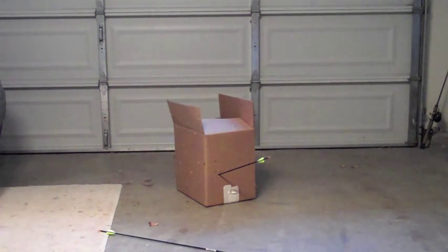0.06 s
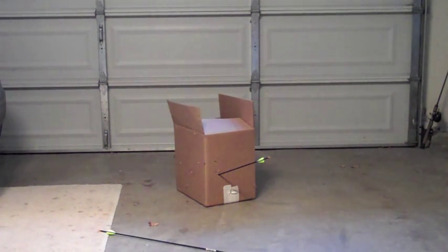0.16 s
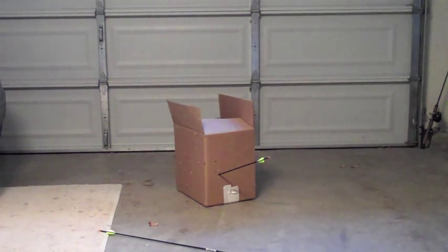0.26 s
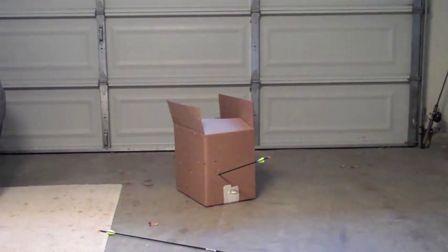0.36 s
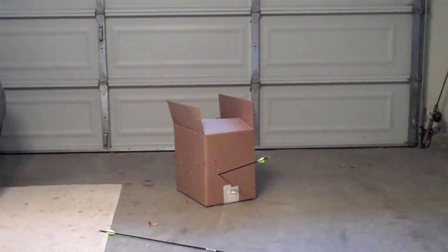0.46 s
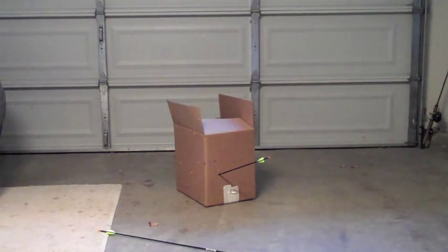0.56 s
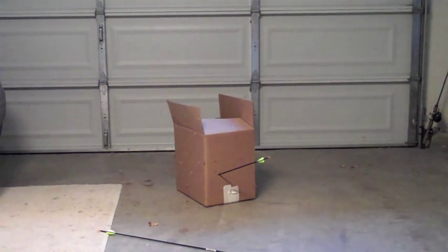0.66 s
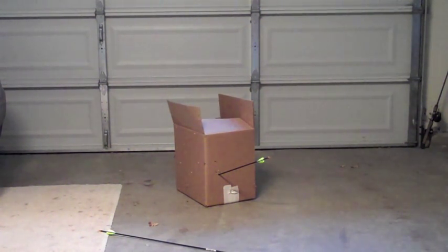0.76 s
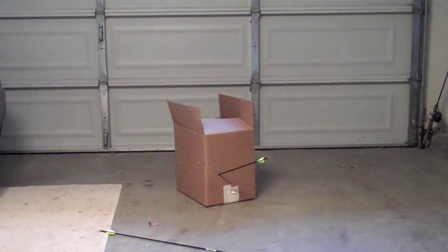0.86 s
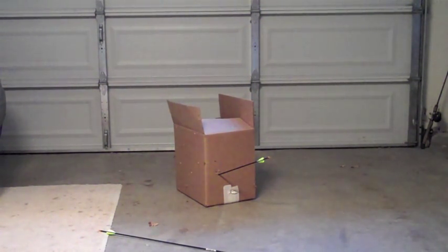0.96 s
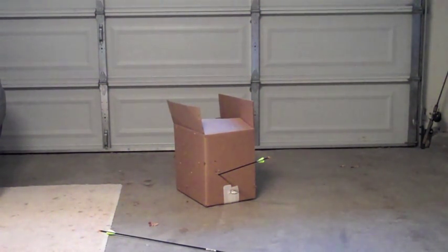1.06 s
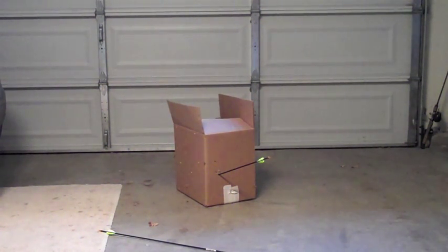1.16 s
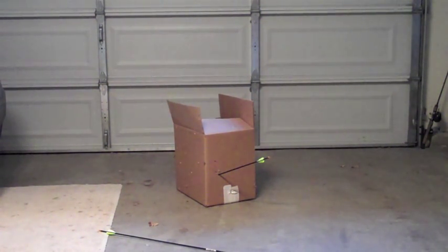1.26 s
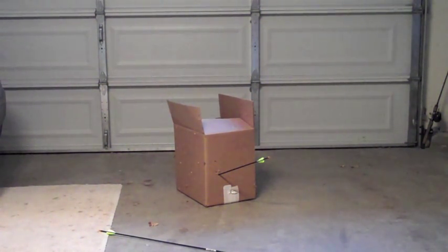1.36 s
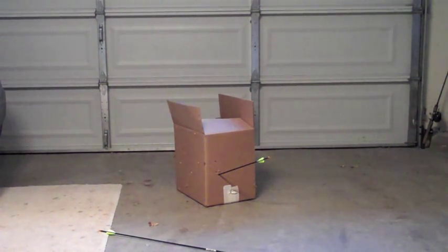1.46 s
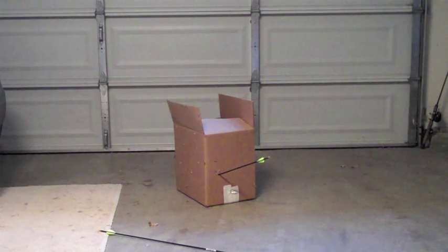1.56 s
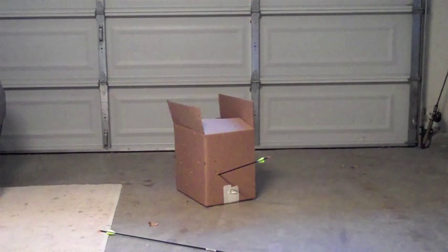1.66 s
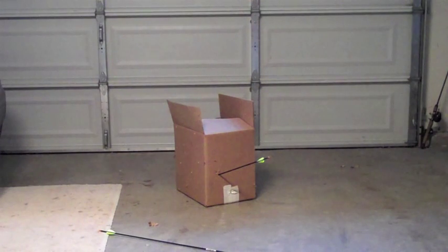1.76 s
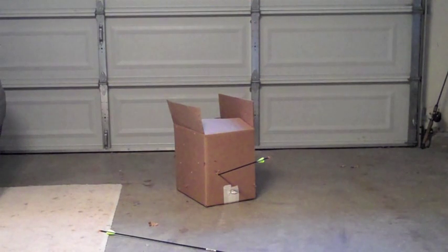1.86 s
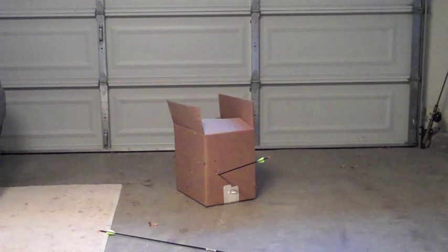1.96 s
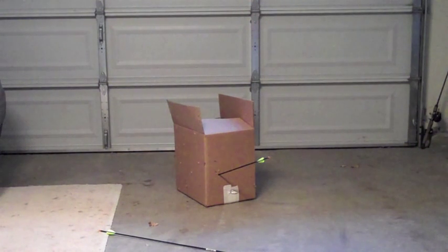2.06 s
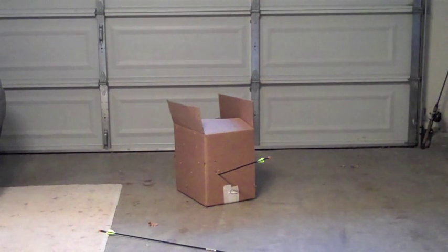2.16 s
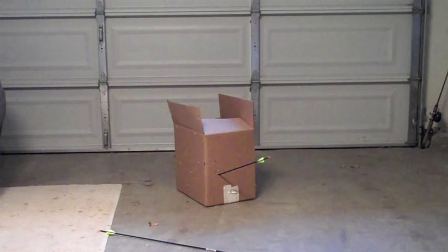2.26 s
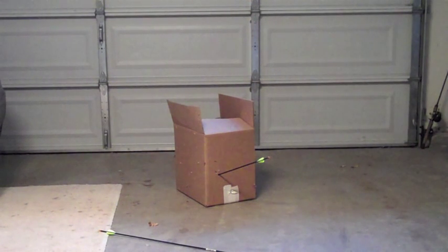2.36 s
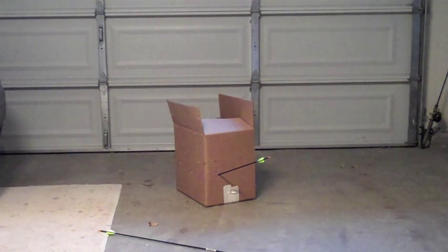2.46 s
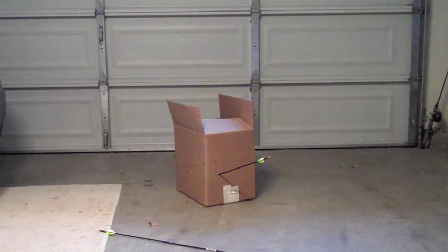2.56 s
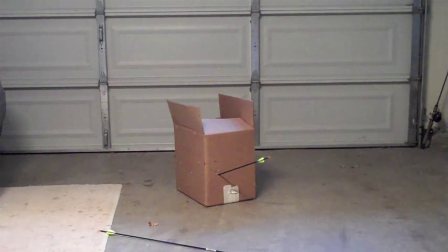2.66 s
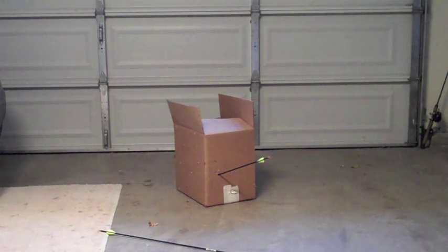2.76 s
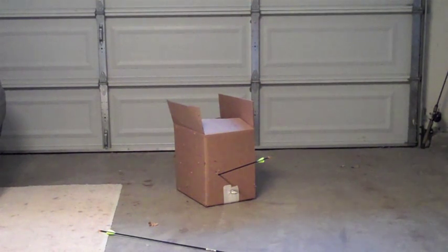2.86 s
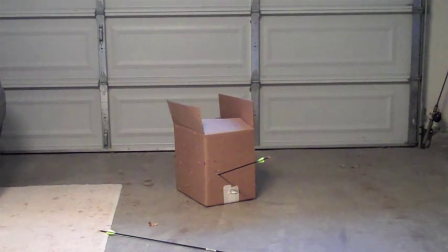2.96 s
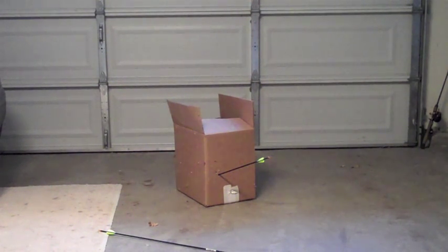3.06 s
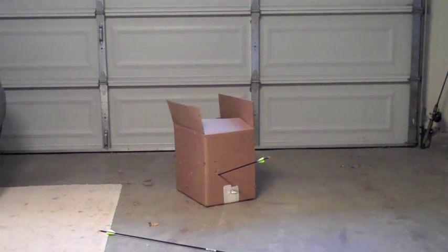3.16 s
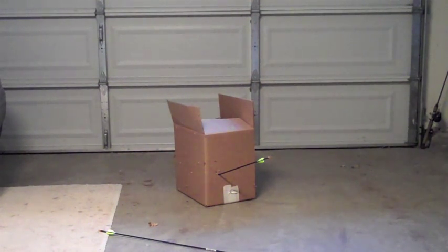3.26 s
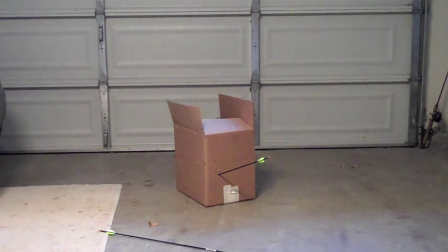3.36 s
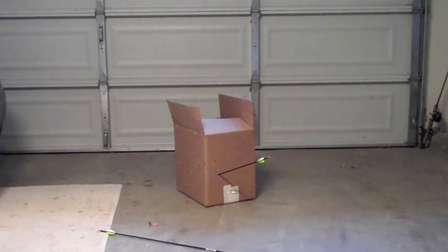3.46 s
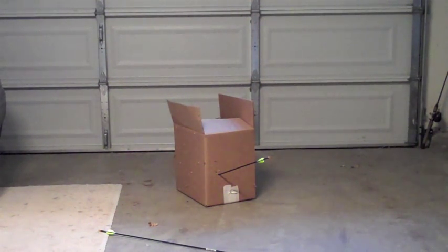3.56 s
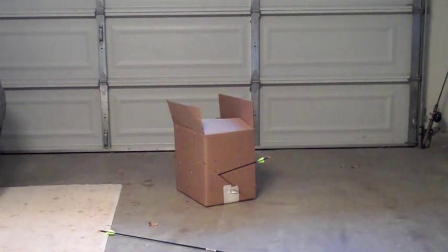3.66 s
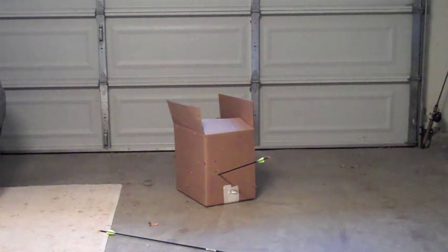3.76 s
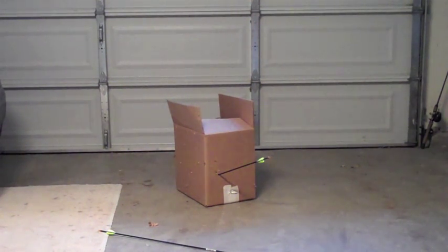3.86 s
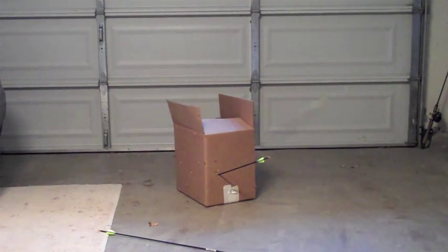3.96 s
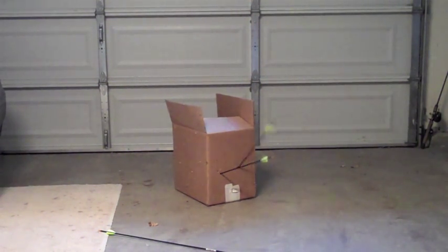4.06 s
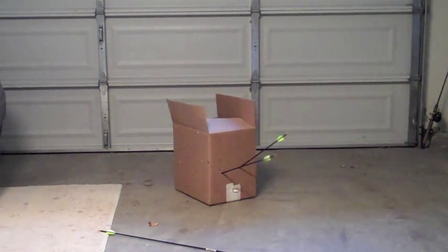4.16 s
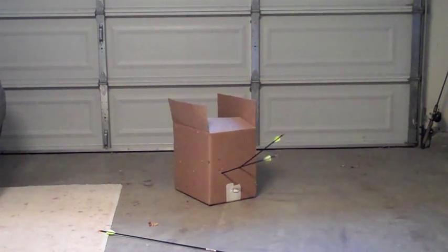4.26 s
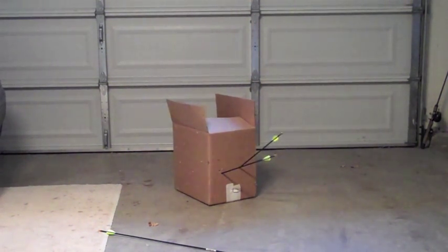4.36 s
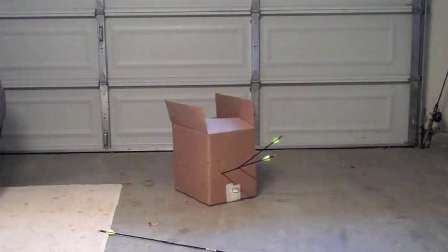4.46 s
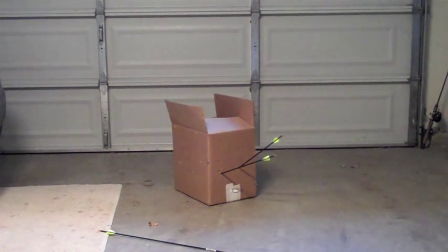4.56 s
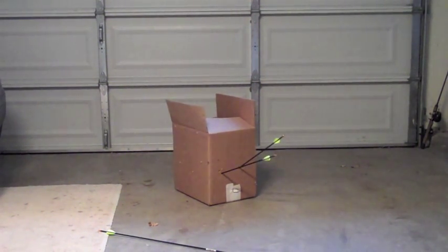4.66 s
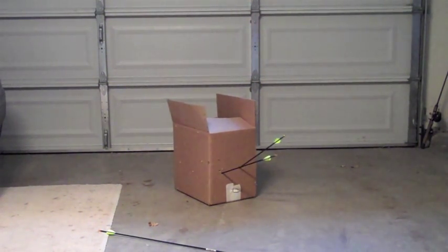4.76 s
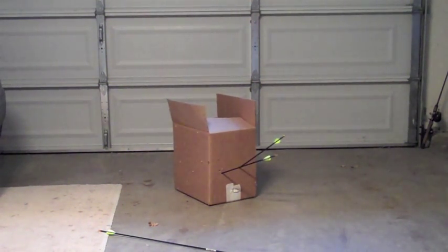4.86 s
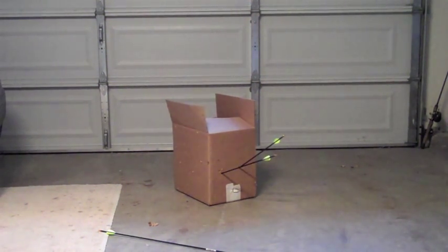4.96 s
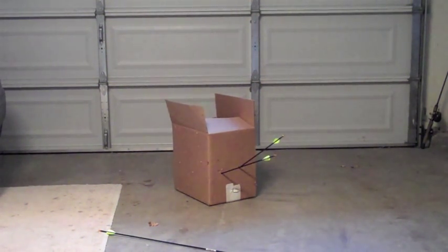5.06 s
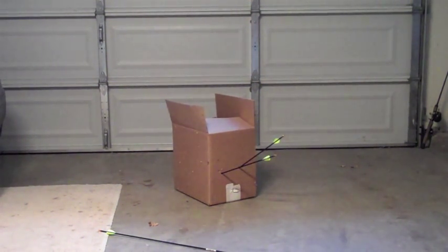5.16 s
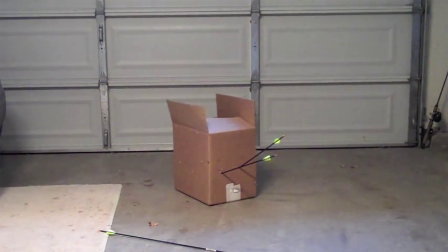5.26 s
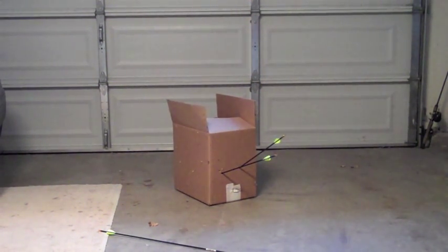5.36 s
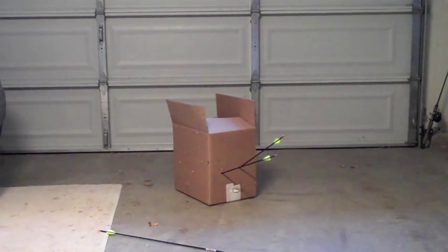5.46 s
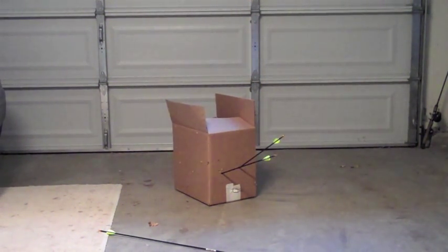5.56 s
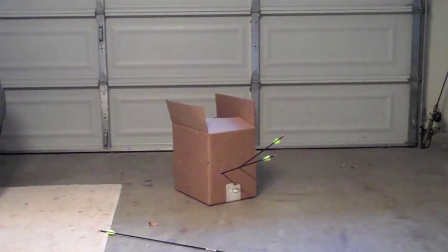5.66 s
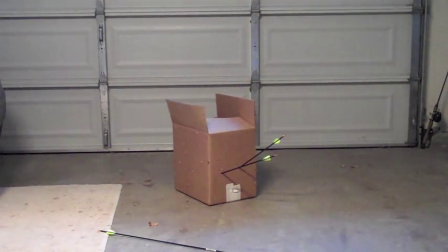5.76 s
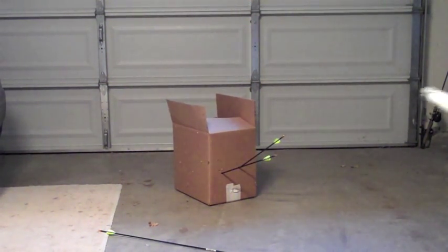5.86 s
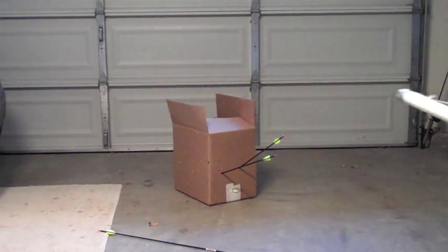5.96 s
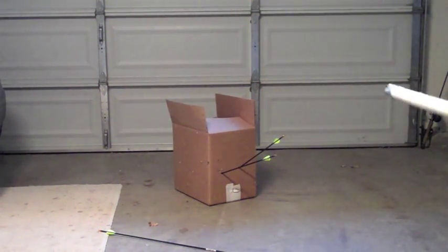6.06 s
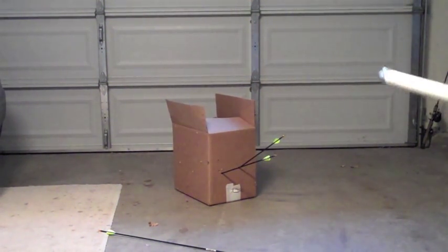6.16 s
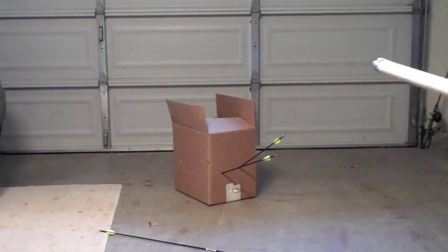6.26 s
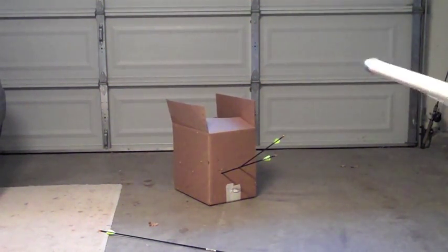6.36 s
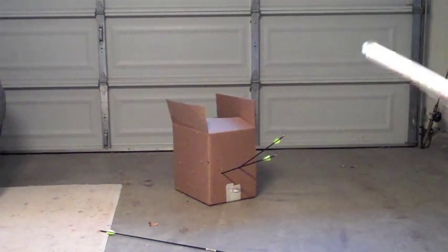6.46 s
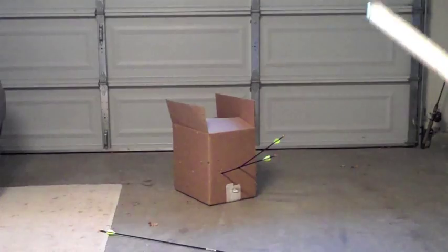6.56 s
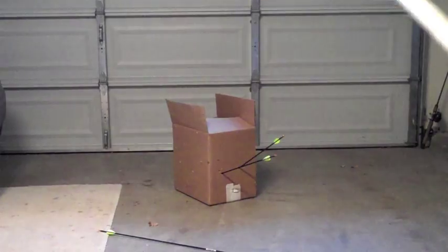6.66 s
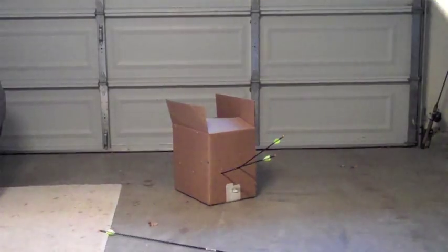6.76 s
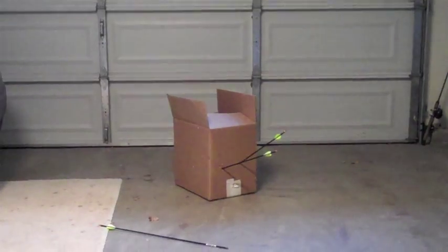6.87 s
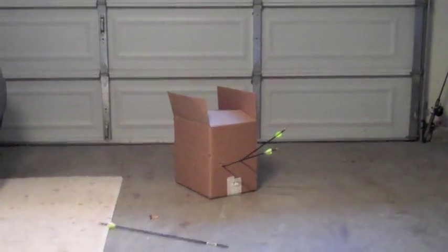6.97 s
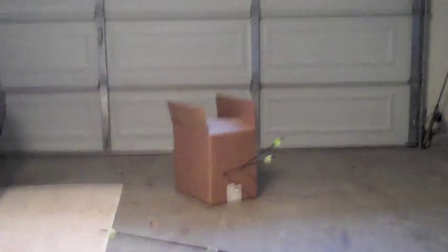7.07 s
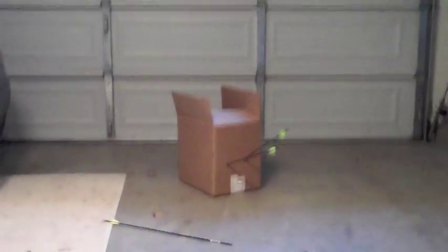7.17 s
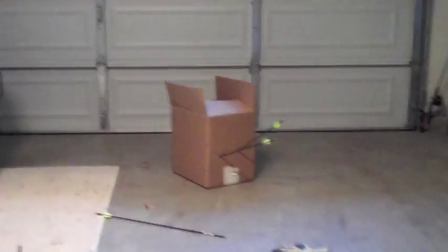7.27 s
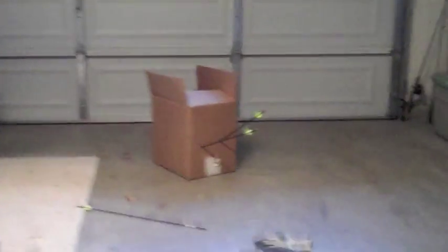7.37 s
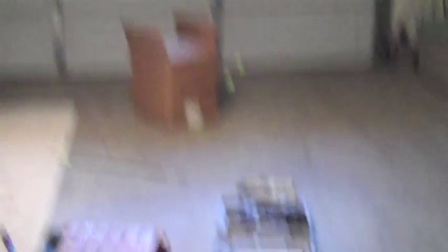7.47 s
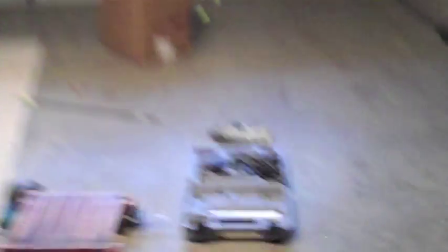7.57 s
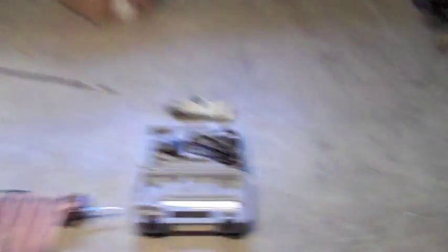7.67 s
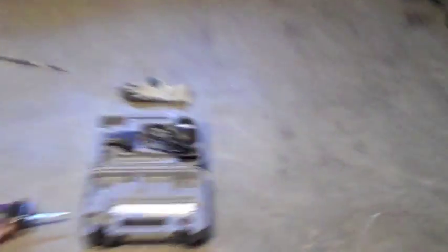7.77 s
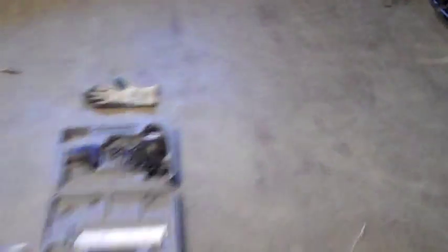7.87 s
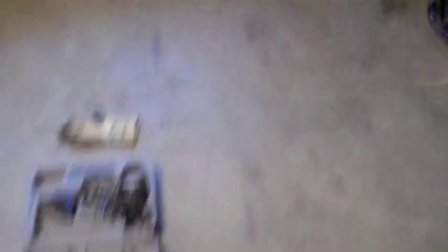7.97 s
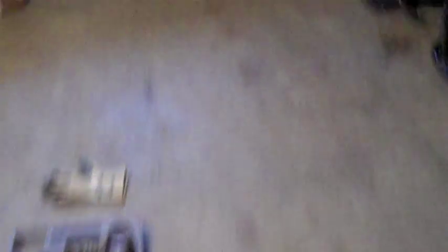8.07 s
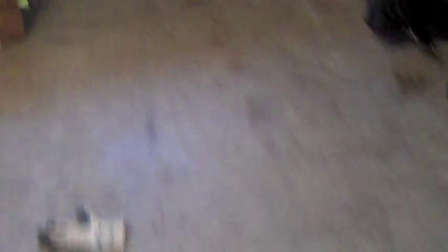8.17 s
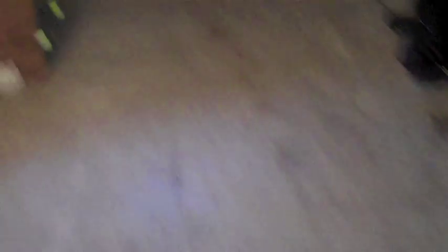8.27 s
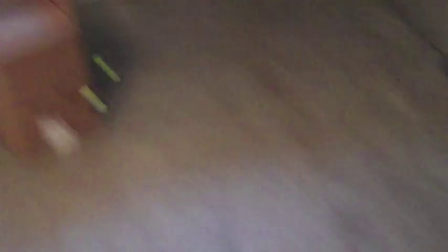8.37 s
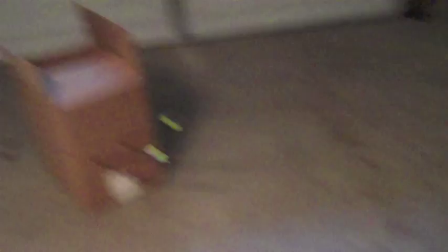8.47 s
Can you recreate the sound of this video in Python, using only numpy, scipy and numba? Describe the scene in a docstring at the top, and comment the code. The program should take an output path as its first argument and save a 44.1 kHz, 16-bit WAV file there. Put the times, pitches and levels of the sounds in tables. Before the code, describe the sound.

In a garage, sleeves rustle faintly close to the microphone while a bow clicks and an arrow ticks against its rest. The string is released with a soft thud, and the arrow hits a cardboard box across the room with a loud, hollow smack and a short echo. The stuck shaft wags briefly. Then a hand rubs and knocks on the microphone, over a faint steady hiss.

```python
"""Arrow into a cardboard box

A garage, heard from a camera's microphone. Close by, sleeves rustle, a bow clicks and the arrow taps its
rest. The string is let go; across the room the box smacks and booms, and the stuck shaft wags. Then a
hand rubs and knocks the camera as it picks it up. The gain control ducks under the smack and climbs
back in faintly ticking steps, over a steady hiss."""
import sys
import numpy as np
from scipy import signal
from scipy.fft import rfft, irfft, next_fast_len
from scipy.io import wavfile
from scipy.ndimage import uniform_filter1d, map_coordinates
from numba import njit

SR = 44100
rng = np.random.default_rng(int(sys.argv[2]) if len(sys.argv) > 2 else 0)


def unload_wav(signal):
    """Save mono or channel-first audio to the path in sys.argv[1] as 16-bit WAV at rate SR, clipped to [-1, 1]."""
    wavfile.write(
        sys.argv[1],
        SR,
        np.round(np.clip(np.atleast_2d(signal).T, -1, 1) * 32767).astype(np.int16),
    )


N = 375732


def amp(db):
    return 10 ** (np.asarray(db) / 20)


def unit(x):
    return x / np.sqrt(np.mean(x ** 2) + 1e-20)


def along(points, hz):
    """Read a curve of (freq_hz, value) points on a log frequency axis."""
    freqs, values = np.transpose(points)
    return np.interp(np.log(hz + 1), np.log(freqs + 1), values)


def wobble(per_s):
    """A smooth random curve with per_s knots a second."""
    knots = rng.standard_normal(int(N * per_s / SR) + 4)
    return map_coordinates(knots, [np.arange(N) * per_s / SR])


def noise(spectrum, size):
    """Coloured noise of rms 1; the spectrum gives relative levels per hertz."""
    padded = next_fast_len(size)
    colour = amp(along(spectrum, np.fft.rfftfreq(padded, 1 / SR)))
    return unit(irfft(rfft(rng.standard_normal(padded)) * colour, padded)[:size])


def blow(x, contact_s=.00025):
    """Let a short sound build up over the contact time, with the energy of 4 ms at rms 1."""
    t = np.arange(len(x)) / SR
    x = x * (1 - np.exp(-(t / contact_s) ** 2))
    return x * np.sqrt(.004 * SR / np.sum(x ** 2))


def burst(spectrum, t60_s):
    """A crack of coloured noise that dies away."""
    return blow(noise(spectrum, SR) * amp(-60 * np.arange(SR) / SR / t60_s))


def pulse(spectrum, size=192):
    """One clean coloured click, about 2 ms late, that sets the room ringing."""
    colour = amp(along(spectrum, np.fft.rfftfreq(size, 1 / SR)))
    click = np.fft.fftshift(irfft(colour))
    return blow(np.pad(click, (0, SR - len(click))))


def ring(modes, detune):
    """Struck modes, with new strengths and slightly new pitches at each blow."""
    t = np.arange(SR) / SR
    out = np.zeros(SR)
    for pitch_hz, level_db, t60_s in modes:
        strength, shift, polarity = rng.standard_normal(3)
        envelope = amp(level_db + 2 * strength - 60 * t / t60_s)
        out += np.sign(polarity) * envelope * np.sin(2 * np.pi * pitch_hz * (1 + detune * shift) * t)
    return blow(out)


def add(track, start_s, sound):
    """Mix a sound into the track."""
    part = track[max(round(start_s * SR), 0):][:len(sound)]
    part += sound[:len(part)]


# Reverberation of the garage: freq_hz, t60_s
GARAGE_DECAY = [(80, .28), (170, .38), (280, .57), (800, .6), (2000, .61), (3800, .59), (5500, .48),
                (8000, .37), (11000, .29), (14000, .23)]

def garage(x, build_s=.00089, size=768):
    """The room's answer: it builds up quickly and each frequency dies at its own speed."""
    hz, t, bands = signal.stft(rng.standard_normal(SR), SR, nperseg=size)
    decay = amp(-60 * t / along(GARAGE_DECAY, hz)[:, None])
    tail = signal.istft(bands * decay, SR, nperseg=size)[1]
    tail *= 1 - np.exp(-np.arange(len(tail)) / SR / build_s)
    return signal.fftconvolve(x, tail / np.linalg.norm(tail))[:len(x)]


# Noise floor at the microphone: freq_hz, level_db
HISS_SPECTRUM = [(15, -36), (25, -3), (70, -7), (140, -7), (182, -12.5), (213, -11), (436, -13.5),
                 (616, -11.5), (684, -12), (1560, -13.5), (14000, -28)]

def hiss():
    """A steady, dull hiss under everything."""
    return amp(-66.5) * noise(HISS_SPECTRUM, N)


# Sleeves, one swish per arm movement: peak_s, level_db, rise_s, fall_s
SWISHES = [(.0, -64.5, .1, 0.25), (.17, -55.5, 0.12, 0.31), (.26, -52, 0.12, 0.16), (1.56, -62, 0.13, 0.42),
           (2.655, -50.5, 0.019, 0.17), (3.752, -53, 0.015, .05), (5.27, -65, 0.12, .3),
           (5.6, -59.5, 0.43, .25), (5.95, -58.5, 0.29, 0.5), (6.18, -55.5, 0.099, 0.34),
           (6.33, -61, 0.21, 0.58), (6.62, -61, 0.25, 0.57), (6.878, -53, 0.25, 0.33), (7.5, -59, .5, 0.85),
           (8.501, -53.5, 0.22, 0.27)]
# Sliding cloth, heard dry: freq_hz, level_db
CLOTH_SPECTRUM = [(180, -35), (300, -14), (376, -10.5), (738, -3), (940, -2), (1700, -1), (3930, -6),
                  (7600, -7), (12700, -14.5), (14000, -23)]

def sleeves(range_db=18.5, flutter_db=.63, grain_db=1.45):
    """Grainy cloth noise; each swish gains range_db over its rise and loses it over its fall."""
    cloth = noise(CLOTH_SPECTRUM, N)
    unevenness = amp(flutter_db * wobble(36) + grain_db * wobble(600))
    power = np.zeros(N)
    for peak_s, level_db, rise_s, fall_s in SWISHES:
        t = np.arange(N) / SR - peak_s
        from_peak = np.where(t < 0, -t / rise_s, t / fall_s)
        power += amp(level_db - range_db * from_peak) ** 2
    return unit(cloth * unevenness) * np.sqrt(power)


# The bow is readied, let go and lowered: start_s, level_db, high_db, room_db (both re level_db)
BOW_SNAPS = [(0.0318, -44.5, -20.5, -4.5), (0.141, -47, -8, -2), (0.2363, -43, -6, -3.5),
             (0.5129, -40.5, -3.5, -0.5), (.727, -41, -3.5, -1), (.893, -39, -7, -1.5),
             (1.5271, -50.5, 9, 2), (1.773, -43, -31, -10.5), (3.4017, -36, -10, -.5),
             (3.7535, -39, -1, .5), (3.776, -31, 2.5, 1), (5.4559, -48, -20, -13)]
# A snap's low and high crack up close, and its return off the walls: freq_hz, level_db
LOW_CRACK = [(200, -30), (500, -41), (900, -8.5), (1900, 12), (3800, 14), (6000, 4), (14000, -49)]
HIGH_CRACK = [(200, -57), (2500, -51), (4400, -6.5), (7000, 6), (9100, 3.5), (12000, -10.5), (14000, -7)]
SNAP_OFF_WALLS = [(120, -25.5), (400, -16.5), (800, -5.5), (1700, 0), (3600, 2), (5500, -0.5), (9000, -4),
                  (14000, -16.5)]
# The bow's frame: pitch_hz, level_db, t60_s
FRAME_MODES = [(2120, 3, .6), (2643, -4, .42), (3268, -1.5, .33), (3688, -1.5, .5), (4161, -3.5, .45),
               (5566, -10, .4)]

def bow_snaps():
    """Dry plastic snaps beside the microphone; the bow's frame rings and the room answers."""
    out = np.zeros(N)
    for start_s, level_db, high_db, room_db in BOW_SNAPS:
        low = amp(-8.5) * burst(LOW_CRACK, t60_s=.015)
        high = amp(high_db + 1) * burst(HIGH_CRACK, t60_s=.0069)
        room = garage(pulse(SNAP_OFF_WALLS))
        frame = amp(-7.5) * ring(FRAME_MODES, detune=.015)
        add(out, start_s, amp(level_db) * (low + high + amp(room_db) * (room + frame)))
    return out


# The arrow meets its rest: start_s, level_db
REST_TAPS = [(2.0663, -44), (2.0753, -45), (2.1605, -51), (2.1913, -47), (2.2934, -48.5), (2.37, -47.5),
             (2.486, -55)]
# The hollow shaft: pitch_hz, level_db, t60_s
SHAFT_MODES = [(1434, -2, 0.45), (2116, 3.5, 0.25), (2080, -3, 0.37), (2390, -16, .4), (2850, -3, 0.45),
               (3090, -1, 0.56), (3570, -6, 0.43), (3550, -1, 0.42), (3760, -3.5, 0.35), (4495, -2, .3),
               (4680, -5, .35), (5850, -4, .3), (6400, -7, 0.28)]
# The tick of contact: freq_hz, level_db
TICK_SPECTRUM = [(300, -18), (1200, -3), (2100, 4), (4000, 0), (7500, -1), (10000, -11), (14000, -45)]

def arrow_taps():
    """The hollow arrow ticks against its rest and rings on, with the garage around it."""
    out = np.zeros(N)
    for start_s, level_db in REST_TAPS:
        shaft = ring(SHAFT_MODES, detune=.0121)
        tick = burst(TICK_SPECTRUM, t60_s=.028)
        room = amp(-1.5) * garage(pulse(TICK_SPECTRUM)) + amp(-4.5) * garage(shaft)
        add(out, start_s, amp(level_db) * (tick + amp(-6) * shaft + room))
    return out


# Thud of the bow's limbs: freq_hz, level_db
LIMB_SPECTRUM = [(60, -11.5), (150, -9), (400, -1), (900, 0.5), (2000, -8), (5000, -16.5), (14000, -36.5)]

def bow_release(start_s=3.775):
    """The string is let go and the limbs thud into the room."""
    out = np.zeros(N)
    direct = amp(-41) * burst(LIMB_SPECTRUM, t60_s=.07)
    room = amp(-34.5) * garage(pulse(LIMB_SPECTRUM))
    add(out, start_s, direct + room)
    return out


# The arrow tears through the walls and shoves the box: start_s, tear_db, boom_db
BOX_BLOWS = [(3.8999, -12, -11), (3.905, -3.5, -5.5), (3.913, -1.5, -6.5), (3.92, 3, 1), (3.930, 4.5, 2.5),
             (3.9377, -11, 10.5), (3.953, -10.5, 10.5)]
# Ripping cardboard and booming panels: freq_hz, level_db
TEAR_SPECTRUM = [(100, -11), (500, -6), (1100, 4), (1700, 1), (2800, -4), (4000, -3.5), (6200, -2.5),
                 (8500, -10), (12500, -17), (14500, -25.5)]
BOOM_SPECTRUM = [(30, -44), (80, -35), (118, -11.5), (150, -15.5), (190, 5.5), (290, -0.5), (520, -7),
                 (700, -1.5), (1150, -9.5), (1450, -16.5), (3000, -22), (6000, -37), (14000, -52.5)]
# The cardboard panels: pitch_hz, level_db, t60_s
PANEL_MODES = [(194.3, 4.5, 0.25), (267.4, -8.5, 0.66), (385, -6, 0.38), (506, -13.5, .6), (685, -4, .42),
               (654, -4.5, .5), (884, -8.5, .42), (1085, -6, .42), (1217, -8, .25), (1555, -12, .4),
               (2060, -15, .4)]

def box_smack(ring_start_s=3.922):
    """Far from the microphone the point rips the cardboard; the panels boom and ring, the room follows."""
    hit, panels = np.zeros((2, N))
    for start_s, tear_db, boom_db in BOX_BLOWS:
        add(hit, start_s, amp(tear_db) * burst(TEAR_SPECTRUM, t60_s=.07))
        add(hit, start_s, amp(boom_db) * burst(BOOM_SPECTRUM, t60_s=.05))
    add(panels, ring_start_s, amp(13.5) * ring(PANEL_MODES, detune=.002))
    return amp(3.5) * hit + amp(-1) * garage(hit, build_s=.013) + panels


# The box wall that holds the arrow: pitch_hz, level_db, t60_s
BOX_WALL_MODES = [(317, -7.5, 0.14), (346, -1.5, 0.063), (473, -10, .068)]

def shaft_wag(start_s=4.519, period_s=.074, swings=7, level_db=-32, loss_db=4):
    """Across the room the stuck shaft nudges the cardboard once a swing, ever more weakly."""
    out = np.zeros(N)
    for swing in range(swings):
        nudge = amp(level_db - swing * loss_db) * ring(BOX_WALL_MODES, detune=.023)
        add(out, start_s + swing * period_s, nudge)
    return out + amp(-1) * garage(out)


# A fingertip landing, right at the microphone: freq_hz, level_db
THUD_SPECTRUM = [(60, -53), (180, 6), (400, 0.5), (650, 6), (950, 2), (1350, 8.5), (1750, -1), (2300, -26),
                 (8000, -36), (14000, -55)]
# The camera's case: pitch_hz, level_db, t60_s
CASE_MODES = [(438, -12.5, 0.12), (672.6, -2.5, 0.1), (903, -1.5, 0.057), (1257, 8.5, 0.024),
              (1434, 4, 0.056)]

def case_thud(pitch_ratio):
    """A fingertip strikes the case, whose modes shift with the place and the grip."""
    modes = [(pitch_hz * pitch_ratio, level_db, t60_s) for pitch_hz, level_db, t60_s in CASE_MODES]
    return amp(-4.5) * burst(THUD_SPECTRUM, t60_s=.037) + amp(1.5) * ring(modes, detune=.029)


# Handling noise as the camera is lifted and the hand settles: time_s, level_db
RUB_LEVELS = [(6.45, -85), (6.6, -63), (6.86, -55.5), (6.94, -55.5), (7.04, -48.5), (7.14, -63.5),
              (7.45, -57.5), (7.7, -55.5), (7.95, -70.5), (8.52, -61.5)]
# Skin sliding on the case: freq_hz, level_db
PALM_SPECTRUM = [(60, -12.5), (120, -0.5), (175, 4.5), (300, -3.5), (500, -1.5), (900, -8), (1400, -12),
                 (2000, -37), (3000, -57)]

def palm_rub(slips_per_s=82, slip_db=5, touch_span_s=(5.8, 7.75), touches_per_s=9.1):
    """The palm rubs the camera in uneven slips; the harder it rubs, the firmer the stray finger touches."""
    time_s, level_db = np.transpose(RUB_LEVELS)
    rub_db = np.interp(np.arange(N) / SR, time_s, level_db, left=-120, right=-120)
    pressure = uniform_filter1d(amp(rub_db), size=600)
    slips = unit(noise(PALM_SPECTRUM, N) * amp(slip_db * wobble(slips_per_s)))
    touches = np.zeros(N)
    for slot_s in np.arange(*touch_span_s, 1 / touches_per_s):
        start_s = slot_s + rng.random() / touches_per_s
        touch_db = rng.normal(-1, 4)
        add(touches, start_s, amp(touch_db) * case_thud(pitch_ratio=rng.uniform(.52, .74)))
    return pressure * (slips + touches)


# Fingers knock the camera: start_s, level_db, clack_db (re level_db), pitch_ratio
KNOCKS = [(6.6041, -45.5, -3.5, 0.85), (6.645, -43, -7.5, 0.99), (6.6863, -46, -10, 1.05),
          (6.836, -35, -4.5, 0.91), (6.9546, -45, -27, 0.76), (6.9996, -45.5, 1, 0.56),
          (7.013, -41, -11, .7), (7.042, -47, -8, .9), (7.174, -49.5, -7, 0.88), (7.301, -44.5, -20, 0.98),
          (7.32, -39.5, -0.5, 0.95), (7.3297, -35.5, -0.5, 0.92), (7.354, -46, -5, 0.77),
          (7.3847, -27, 0.5, .96), (7.4332, -40, -8.5, .75), (7.5094, -45.5, -29, 0.5),
          (7.7401, -47.5, -2, 1.13), (7.8339, -47.5, -1.5, 0.56), (7.8595, -46.5, -25, .85),
          (8.1939, -41, -17.5, .7)]
# A sharp clack on plastic: freq_hz, level_db
CLACK_SPECTRUM = [(300, -45), (2100, -11), (2870, 2.5), (3600, 14), (4500, 4.5), (5600, 2), (6600, 9.5),
                  (8000, 1), (10500, -4.5), (14000, -31)]
# The camera's plastic shell: pitch_hz, level_db, t60_s
SHELL_MODES = [(2877, 3, 0.027), (4330, -1, 0.035), (4710, -1, 0.029), (5200, -9.5, 0.041),
               (6250, -1.5, 0.033), (7000, -8, 0.039)]

def finger_knocks():
    """Knocks ring the case and the sharper ones clack its shell, so close that there is little room."""
    out = np.zeros(N)
    for start_s, level_db, clack_db, pitch_ratio in KNOCKS:
        clack = burst(CLACK_SPECTRUM, t60_s=.0072) + amp(-2) * ring(SHELL_MODES, detune=.0214)
        thud = case_thud(pitch_ratio) + amp(-18.5) * garage(pulse(THUD_SPECTRUM))
        add(out, start_s, amp(level_db) * thud)
        add(out, start_s, amp(level_db + clack_db) * (clack + amp(-16) * garage(clack)))
    return out


def scene():
    """The shot and the handling around it, at one microphone."""
    target = box_smack() + shaft_wag()
    bow = bow_snaps() + bow_release() + arrow_taps()
    return (target + bow + finger_knocks() + sleeves() + hiss() + palm_rub())[None]


@njit
def gain_control(level, threshold, depth_db, steps, attack_s, hold_s, release_s):
    """Cut in dB: one step down per attack time while too loud; after a hold, one back per release time."""
    cut_db, step_db = np.zeros(len(level)), depth_db / steps
    steps_down, since_cut, wait = 0, 0.0, 0.0
    for i in range(len(level)):
        since_cut += 1
        wait -= 1
        too_loud = level[i] > threshold * 10 ** (steps_down * step_db / 20)
        if too_loud and steps_down < steps and since_cut > attack_s * SR:
            steps_down, since_cut, wait = steps_down + 1, 0.0, hold_s * SR
        elif steps_down > 0 and wait <= 0:
            steps_down, wait = steps_down - 1, release_s * SR
        cut_db[i] = steps_down * step_db
    return cut_db


# Low noise of the camera's electronics: freq_hz, level_db
RUMBLE_SPECTRUM = [(20, 2.5), (60, -7.5), (110, -12.5), (200, -26.5), (600, -69.5)]

def record(dry, low_cut_hz=128, top_hz=14050, ceiling=.72, offset=.115, offset_block_hz=2.6):
    """Behind the microphone: low cut, stepped gain control, saturation, rumble and a steep high cut."""
    low_cut = signal.butter(3, low_cut_hz, "high", fs=SR, output="sos")
    x = signal.sosfilt(low_cut, dry)
    cut_db = gain_control(np.abs(x[0]), threshold=.18, depth_db=18, steps=38,
                          attack_s=.0005, hold_s=.351, release_s=.03413)
    gain = uniform_filter1d(uniform_filter1d(amp(-cut_db), size=17), size=11)
    x = x * gain
    saturated = x / (1 + np.abs(x / ceiling) ** 4) ** (1 / 4)
    # Each gain step shifts the preamplifier's offset; only the jumps come through, as ticks.
    offset_block = signal.butter(1, offset_block_hz, "high", fs=SR, output="sos")
    ticks = signal.sosfilt(offset_block, offset * (gain - 1))
    x = signal.sosfilt(low_cut, saturated) + ticks + amp(-71) * noise(RUMBLE_SPECTRUM, N)
    padded = next_fast_len(N + SR // 2)
    high_cut = 1 / (1 + (np.fft.rfftfreq(padded, 1 / SR) / top_hz) ** 100)
    return irfft(rfft(x, padded) * high_cut, padded)[:, :N]


dry = scene()
out = record(dry)
unload_wav(out)
```